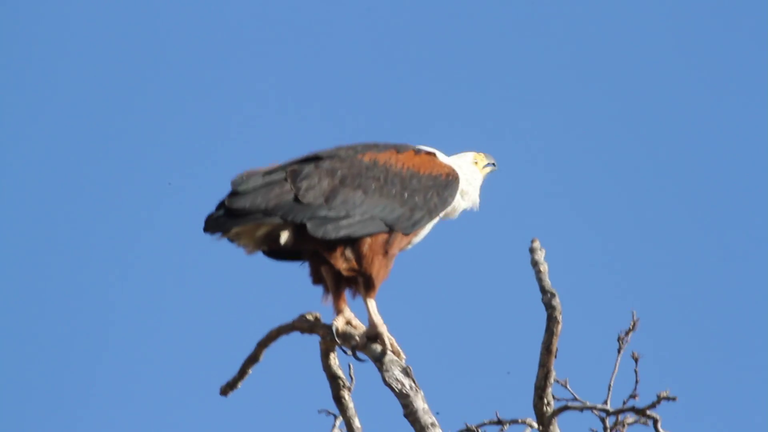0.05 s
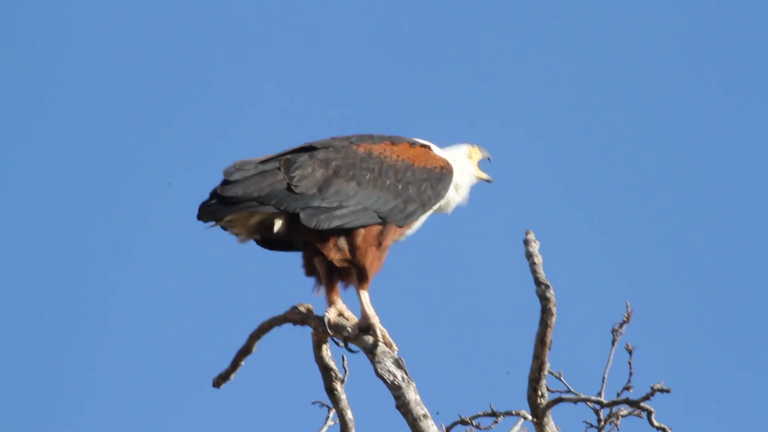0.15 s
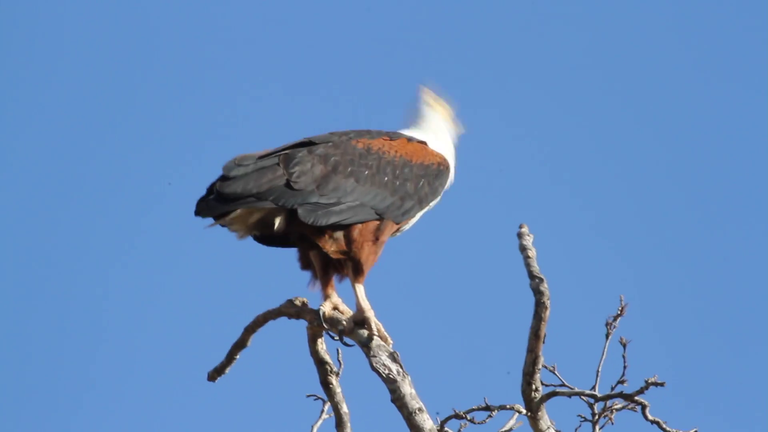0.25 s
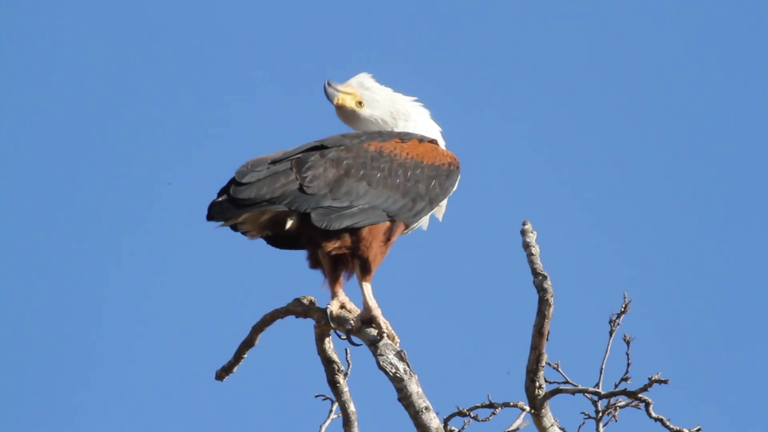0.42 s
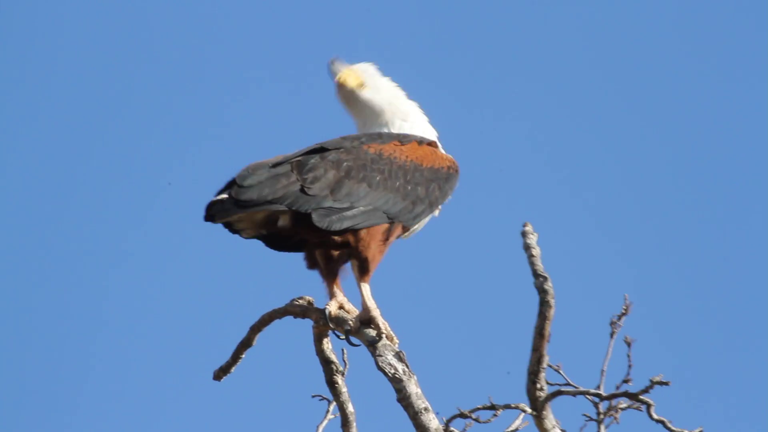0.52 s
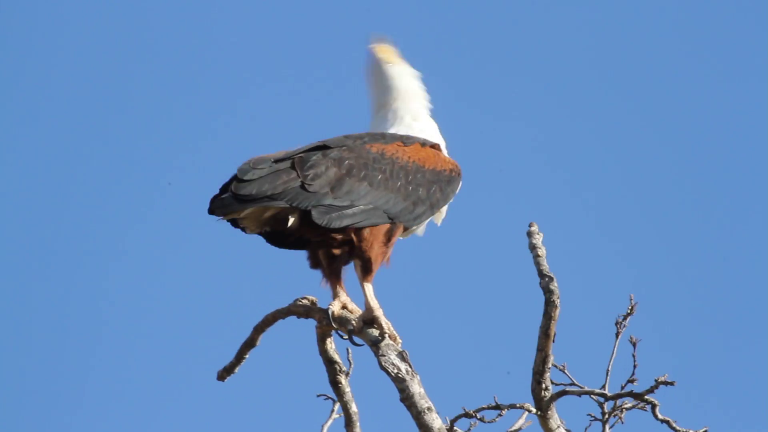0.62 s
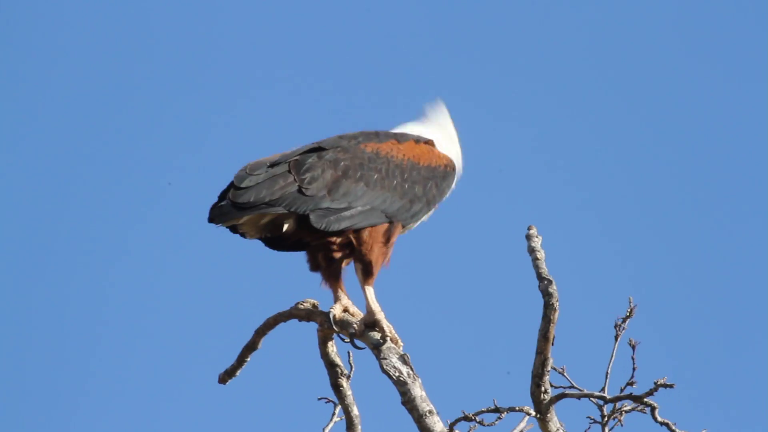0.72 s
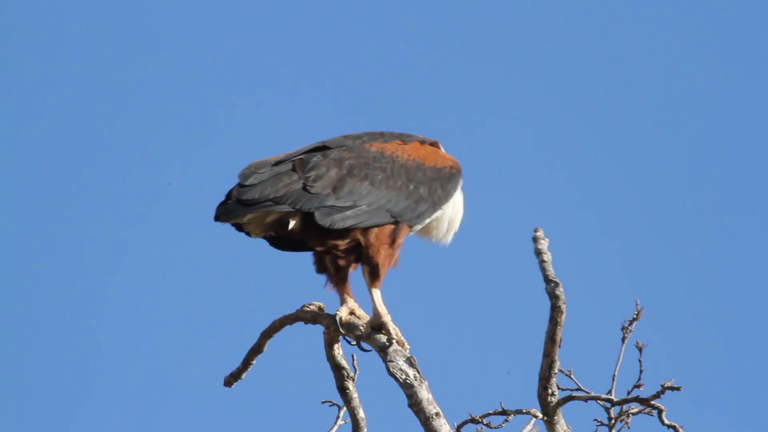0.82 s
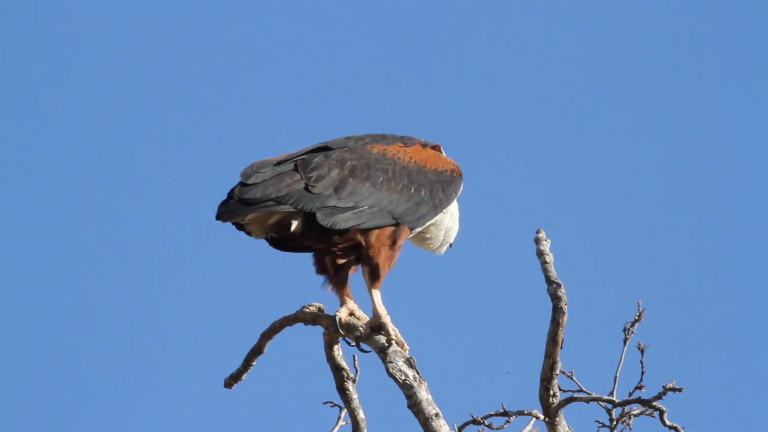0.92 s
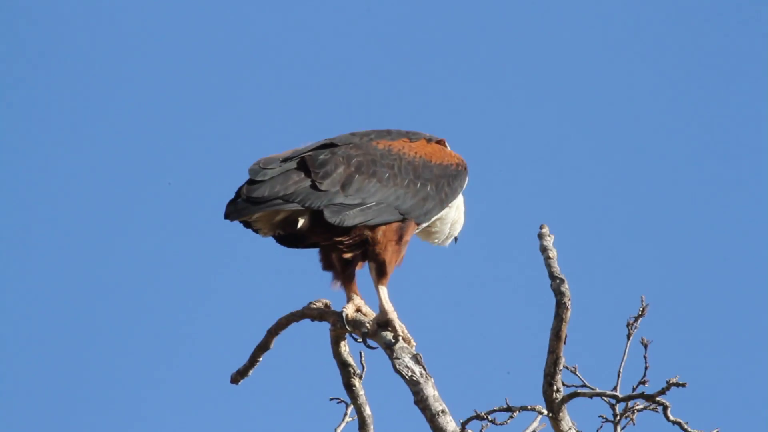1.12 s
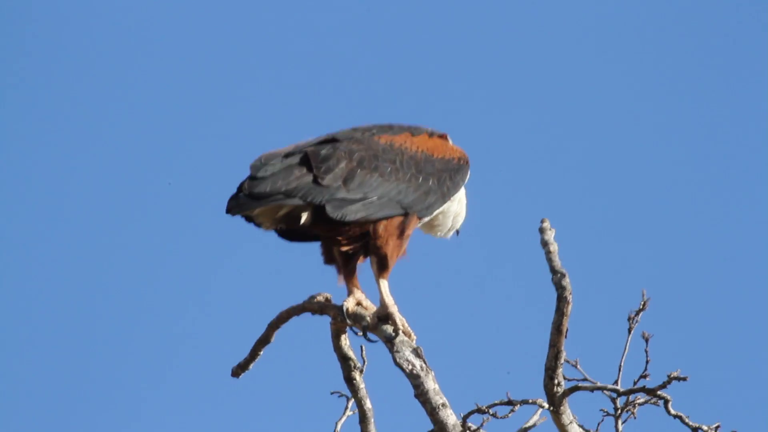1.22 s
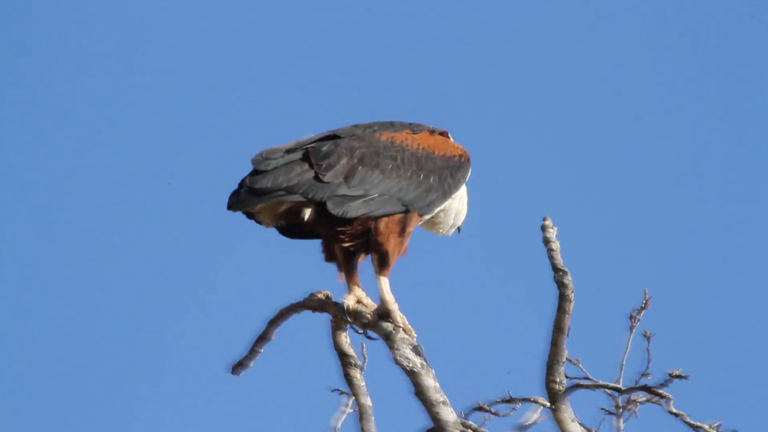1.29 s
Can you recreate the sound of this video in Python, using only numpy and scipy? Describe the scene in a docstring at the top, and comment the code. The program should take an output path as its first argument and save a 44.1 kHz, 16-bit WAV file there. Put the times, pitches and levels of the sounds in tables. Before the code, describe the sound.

A fish eagle cries outdoors over a quiet distant rush. An earlier call's thin echo fades at the start. At 0.2 s a loud yelp rises and arches, cracking near 0.34 into a higher falling note that weakens until 0.5. A tiny rustle follows, then a lower, purer whistle slides down from 0.6 to 0.8, with soft low puffs near 0.73. Tree echoes fade into quiet air.

```python
"""A fish eagle gives three ringing cries: an arched yelp that cracks into a higher, falling note,
then a lower, purer whistle. Each is a stack of harmonics with breath noise, and rasps most at its edges.
The trees scatter the voice back as fading noise echoes. Low puffs and one rustle are short bursts of noise.
Behind lies a quiet, distant rush of noise. An earlier cry still echoes as fading noise and a thin, faint tone.
"""
import sys
import numpy as np
from scipy import signal
from scipy.fft import rfft, irfft
from scipy.io import wavfile
from scipy.ndimage import uniform_filter1d

SR = 44100
rng = np.random.default_rng(int(sys.argv[2]) if len(sys.argv) > 2 else 0)


def digitize_waveform(pressure):
    """Quantize a signal to 16-bit integers and store it at the path in sys.argv[1].

    Rows of a 2-D input are taken as channels; values are limited to [-1, 1].
    """
    field = np.atleast_2d(pressure).T
    bounded = np.clip(field, -1, 1)
    quanta = np.round(bounded * 32767).astype(np.int16)
    wavfile.write(sys.argv[1], SR, quanta)


N = 59535
T = np.arange(N) / SR   # time of every sample, in seconds


def from_db(db):
    """Turn decibels into a gain."""
    return 10 ** (np.asarray(db) / 20)


def rms_one(x):
    """Scale a sound so that its rms (average strength) is 1."""
    return x / np.sqrt(np.mean(x ** 2) + 1e-20)


def in_time(rows):
    """Draw straight lines between the rows, giving each column a value at every sample."""
    seconds, *columns = np.transpose(rows)
    return [np.interp(T, seconds, column) for column in columns]


def gate(rows):
    """Let sound through for as long as a curve lasts, with a short fade outside each end."""
    fade_s = 0.002
    opening = np.clip((T - rows[0][0]) / fade_s + 1, 0, 1)
    closing = np.clip((rows[-1][0] - T) / fade_s + 1, 0, 1)
    return opening * closing


def bump(middle_s, width_s):
    """A bell-shaped swell that peaks at 1."""
    return np.exp(-0.5 * ((T - middle_s) / width_s) ** 2)


def colour(x, spectrum):
    """Filter a sound by rows of frequency in Hz and gain in dB, joined on a log frequency scale."""
    hz, db = np.transpose(spectrum)
    bins = np.maximum(np.fft.rfftfreq(len(x), 1 / SR), 1)
    gain = from_db(np.interp(np.log(bins), np.log(hz), db))
    return irfft(rfft(x) * gain, len(x))


def noise(spectrum):
    """Random noise with a given colour and an rms of 1."""
    return rms_one(colour(rng.standard_normal(N), spectrum))


def drift(rate_hz):
    """A smooth random wander of rms 1, whose movements weaken steeply above the given rate."""
    bins = np.fft.rfftfreq(N, 1 / SR)
    smoothed = rfft(rng.standard_normal(N)) / (1 + (bins / rate_hz) ** 4)
    return rms_one(irfft(smoothed, N))


def eagle():
    """The bird's whole voice: three cries, brief second tones where it cracks, and faint low notes."""
    # The three cries. Each row: time in seconds, pitch in Hz, then levels in dB
    # of the fundamental, second harmonic, third harmonic and all the upper harmonics together.
    yelp = [(0.2,870,-43.5,-43.5,-65,-71), (0.209,1018,-38.5,-26.5,-42,-49), (0.216,1161,-30,-35.5,-37,-56),
            (0.224,1220,-22,-32.5,-32.5,-48), (0.231,1327,-23,-33.5,-39,-46),
            (0.238,1329,-13,-24,-38,-39.5), (0.252,1383,-13,-35.5,-26.5,-39),
            (0.265,1399,-12,-34.5,-35,-32), (0.278,1407,-10.5,-32.5,-48,-34.5),
            (0.291,1384,-9,-31,-25,-34.5), (0.305,1360,-10.5,-28,-32,-31.5),
            (0.316,1300,-10.5,-24.5,-30.5,-40), (0.324,1300,-17,-30.5,-28.5,-46.5),
            (0.331,1225,-27.5,-31.5,-42,-48.5), (0.346,1223,-17.5,-34,-52.5,-55.5),
            (0.356,1232,-33.5,-48,-59,-54)]
    high_note = [(0.349,1559,-9.5,-35.5,-48,-45), (0.355,1471,-7,-40,-47.5,-44.5),
                 (0.361,1479,-9,-32,-49,-53), (0.367,1436,-9.5,-31.5,-45.5,-47),
                 (0.377,1428,-11,-43,-44,-53), (0.386,1383,-10.5,-46,-63.5,-45.5),
                 (0.396,1371,-13,-43.5,-56,-48), (0.402,1473,-21.5,-50,-45.5,-57.5),
                 (0.411,1458,-20.5,-44,-44.5,-48), (0.42,1462,-24,-44.5,-54,-49),
                 (0.46,1444,-27.5,-43,-49.5,-54), (0.479,1442,-25,-63,-42.5,-54.5),
                 (0.488,1417,-27.5,-44,-37.5,-42), (0.496,1334,-27,-55,-57,-53.5),
                 (0.511,1293,-42,-63,-65,-70)]
    whistle = [(0.602,1042,-35,-42.5,-54,-67), (0.611,1179,-23,-56.5,-62,-55),
               (0.623,1181,-28,-59,-54.5,-51.5), (0.631,1209,-15,-45.5,-68,-51.5),
               (0.645,1226,-16.5,-49,-72,-43.5), (0.658,1231,-16.5,-59,-58.5,-48),
               (0.674,1223,-16,-59,-56.5,-56), (0.702,1202,-19,-60,-72,-68.5),
               (0.725,1186,-17.5,-62.5,-47,-47.5), (0.739,1163,-18,-61,-53,-54),
               (0.749,1152,-18.5,-77,-80,-64), (0.766,1130,-21,-71,-53,-51.5),
               (0.776,1119,-23.5,-52,-51.5,-55), (0.784,1095,-32.5,-52,-61.5,-64.5),
               (0.79,985,-33.5,-67,-72,-71.5), (0.803,896,-49,-74,-77,-87), (0.815,814,-41,-72,-83.5,-77)]
    # Balance of the upper harmonics, from the fourth up. Each number: relative level in dB.
    yelp_upper = [0, -0.5, -5, -0.5, -1.5, -10.5, -7, -13, -20]
    high_upper = [5, -3.5, -4.5, -6.5, -5, -8, -6.5, -21.5]
    whistle_upper = [3.5, -21, -5, -20.5, -27, -16, -23, -31, -25]
    # Rasp of the voice. Each row: time in seconds, roughness from 0 to 1.
    yelp_rasp = [(0.2, 0.55), (0.211, 0.48), (0.22, 0.17), (0.236, 0), (0.315, 0), (0.335, 0.04),
                 (0.356, 0.03)]
    high_rasp = [(0.346, 0.32), (0.355, 0.027), (0.395, 0.025), (0.41, 0.035), (0.479, 0.038),
                 (0.513, 0.077)]
    whistle_rasp = [(0.602, .7), (0.622, .55), (0.629, .018), (0.775, .018), (0.79, .06), (0.815, .25)]
    # Cracks in the voice. Each row: start in seconds, length in seconds,
    # first pitch in Hz, last pitch in Hz, peak level in dB.
    crack_rows = [(0.338, 0.01, 1711, 1670, -12.5), (0.611, 0.0167, 915, 958, -24.5),
                  (0.788, 0.0139, 1030, 921, -22.5)]
    # Faint low notes before the yelp and the whistle.
    # Each row: start in seconds, length in seconds, pitch in Hz, peak level in dB.
    low_rows = [(0.128, .07, 908, -58.5), (0.528, 0.062, 938, -44)]

    voice = cry(yelp, yelp_upper, yelp_rasp)
    voice = voice + cry(high_note, high_upper, high_rasp)
    voice = voice + cry(whistle, whistle_upper, whistle_rasp)
    for start, length, hz, db in low_rows:
        curve = chirp(start, length, hz, hz, db, edge_db=11.5)
        voice = voice + thin_note(curve, rough=0.42, overtone_db=-18)
    for row in crack_rows:
        curve = chirp(*row, edge_db=14)
        voice = voice + thin_note(curve, rough=0.17, overtone_db=-31)
    return voice


def cry(curve, upper_db, rasp):
    """Three lower harmonics, flickering upper harmonics and air that pulses with each cycle of the voice."""
    flicker_db, flicker_hz = 5, 18   # each upper harmonic swells on its own
    hiss_db, hiss_rasp_db = -20.5, 20   # air against the upper harmonics; extra at full roughness
    # Colour of the air through the throat. Each row: frequency in Hz, relative level in dB.
    hiss_colour = [(900, -25.5), (2000, 2.5), (5500, -3.5), (9000, -8.5), (12000, -1), (15500, -12)]

    hz, first_db, second_db, third_db, top_db = in_time(curve)
    rough, = in_time(rasp)
    phase, strength = syrinx(hz, rough)

    gains = [from_db(db) for db in (first_db, second_db, third_db)]
    shares = from_db(upper_db) / np.linalg.norm(from_db(upper_db))
    for share in shares:
        gains.append(share * from_db(top_db + flicker_db * drift(flicker_hz)))
    harmonics = sum(gain * np.sin(k * phase) for k, gain in enumerate(gains, 1))
    tone = np.sqrt(2) * harmonics   # a sine of this height has rms 1

    air_db = top_db + hiss_db + hiss_rasp_db * np.sqrt(np.clip(rough, 0, 1))
    pulses = 1 + np.sin(phase)
    hiss = from_db(air_db) * pulses * noise(hiss_colour)
    return gate(curve) * strength * (tone + hiss)


def syrinx(hz, rough):
    """Phase and strength of the bird's vibrating membranes; roughness shakes both."""
    glide_s = 0.006   # the pitch rounds its corners over this time
    waver_share, waver_hz = 0.00053, 90   # small pitch waver, always present
    rasp_hz = 330
    rasp_pitch_share, rasp_depth_db = 0.1, 4.5   # shake for a roughness of 1

    glide = uniform_filter1d(hz, max(int(glide_s * SR), 1))
    waver = waver_share * drift(waver_hz)
    pitch_rasp = rasp_pitch_share * rough * drift(rasp_hz)
    phase = 2 * np.pi * np.cumsum(glide * (1 + waver + pitch_rasp)) / SR
    strength = from_db(rasp_depth_db * rough * (drift(rasp_hz) - rough / 2))
    return phase, strength


def thin_note(curve, rough, overtone_db):
    """A rough tone, shaken in the same way as the voice, with just one overtone at twice the pitch."""
    hz, db = in_time(curve)
    phase, strength = syrinx(hz, rough)
    tone = np.sin(phase) + from_db(overtone_db) * np.sin(2 * phase)
    return gate(curve) * strength * from_db(db) * tone * np.sqrt(2)


def chirp(start, length, first_hz, last_hz, db, edge_db):
    """The curve of a short note that swells and fades as it glides, its ends edge_db under its peak."""
    middle_hz = (first_hz + last_hz) / 2
    return [(start, first_hz, db - edge_db),
            (start + length / 2, middle_hz, db),
            (start + length, last_hz, db - edge_db)]


def trees(x):
    """Scatter the voice into near and far echoes: bands of fading noise, with the treble dying sooner."""
    first_echo_s = 0.012
    # Each row: level in dB before colouring, time in seconds to fall 60 dB before the treble loss.
    layers = ((-21.5, 0.28), (-26.5, 1.8))   # near, far
    treble_loss_hz = 9000   # echoes die twice as fast here
    # Colour of the scatter. Each row: frequency in Hz, gain in dB.
    echo_colour = [(500, -18), (1000, -3), (1200, -4), (1450, -2.5), (2800, 9.5), (4200, 9.5), (5600, 12),
                   (8000, 1.5), (12000, -2), (15000, -10.5)]

    late = np.maximum(T - first_echo_s, 0)
    response = 0
    edges = np.geomspace(500, 16000, 6)   # five bands, in Hz
    for low, high in zip(edges, edges[1:]):
        band_filter = signal.butter(2, [low, high], "band", fs=SR, output="sos")
        band = signal.sosfilt(band_filter, rng.standard_normal(N))
        haste = 1 + np.sqrt(low * high) / treble_loss_hz
        for db, t60 in layers:
            tail = np.exp(-np.log(1000) * late * haste / t60) * (late > 0)
            response = response + from_db(db) * band * tail / np.linalg.norm(tail)
    response = colour(response, echo_colour) * (late > 0)
    return signal.fftconvolve(x, response)[:N]


def feathers():
    """Low puffs of noise, perhaps the feathers as the head swings, and one short, brighter rustle."""
    # Each row: middle in seconds, width in seconds, level in dB.
    puff_rows = [(0.083, 0.027, -55), (0.718, 0.0047, -39.5), (0.725, 0.0054, -39.5), (0.744, 0.0055, -38),
                 (0.761, 0.013, -50.5)]
    # Colours of the puffs and the rustle. Each row: frequency in Hz, relative level in dB.
    puff_colour = [(80, -38.5), (160, -14.5), (220, 2.5), (290, -8.5), (360, 7.5), (450, -34), (550, -0.5),
                   (900, -37), (2000, -35), (8000, -40)]
    rustle_colour = [(500, -18), (2000, -9), (5500, 26), (9000, -21), (15000, -9)]

    rustle = from_db(-59) * bump(middle_s=0.56, width_s=0.0025) * noise(rustle_colour)
    puff_level = sum(from_db(db) * bump(middle, width) for middle, width, db in puff_rows)
    return puff_level * noise(puff_colour) + rustle


def distance():
    """Steady noise for the rush with one brief swell, and an earlier cry's echo as fading noise and a tone."""
    # Colours of the rush, its swell and the old echo. Each row: frequency in Hz, relative level in dB.
    air_colour = [(20, -37.5), (45, -21), (100, -17), (170, -11.5), (260, -6), (380, -0.5), (520, 0.5),
                  (660, -3), (800, -15), (1000, -21), (1300, -11), (1700, -19), (3000, -20.5), (7000, -23),
                  (12500, -27.5), (15800, -23.5)]
    swell_colour = [(120, -23.5), (260, -5), (500, 4), (650, -6), (900, -31), (3000, -48)]
    old_echo_colour = [(900, -57), (1150, -16.5), (1300, 0), (1420, 2), (1530, -23.5), (1680, -54),
                       (2600, -38.5), (2900, -17.5), (3200, -42), (3850, -21.5), (4600, -45), (5500, -20),
                       (6300, -55.5)]
    # A thin, faint tone left ringing from the earlier cry.
    # Each row: time in seconds, pitch in Hz, level in dB.
    echo_tone = [(0.0, 1467, -50), (0.06, 1474, -54), (0.13, 1503, -49.5), (0.2, 1493, -57)]
    echo_start_db, echo_fall_db_per_s = -42.5, 67.5

    air = from_db(-51.5) * noise(air_colour)
    swell = from_db(-50.5) * bump(middle_s=1.3, width_s=0.029) * noise(swell_colour)
    old_echo = from_db(echo_start_db - echo_fall_db_per_s * T) * noise(old_echo_colour)
    return air + swell + old_echo + thin_note(echo_tone, rough=0.074, overtone_db=-10)


def scene():
    """Add up the bird, its echoes, the feathers and the distance, as one channel."""
    voice = eagle()
    return (voice + trees(voice) + feathers() + distance())[None]


def record(dry):
    """Cut the very top of the sound steeply with a low-pass filter."""
    cutoff_hz = 15650
    low_pass = signal.ellip(12, 0.1, 80, cutoff_hz, fs=SR, output="sos")   # ripple 0.1 dB, cut 80 dB
    return signal.sosfilt(low_pass, dry)


dry = scene()
out = record(dry)
digitize_waveform(out)
```